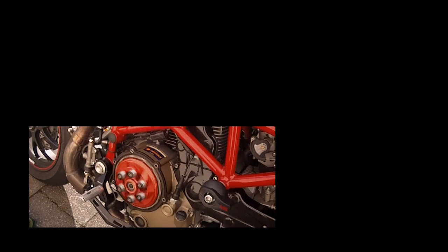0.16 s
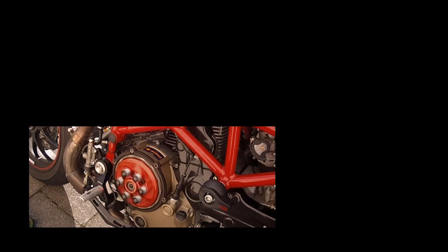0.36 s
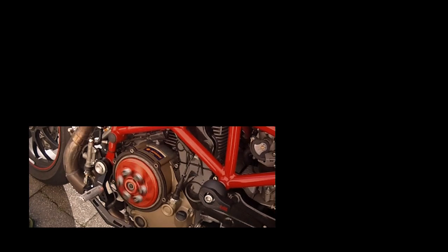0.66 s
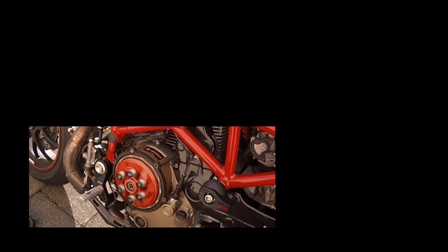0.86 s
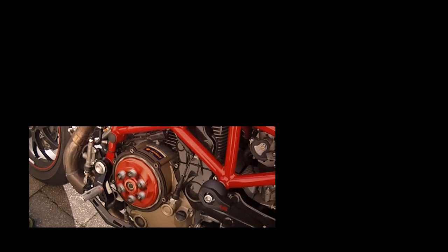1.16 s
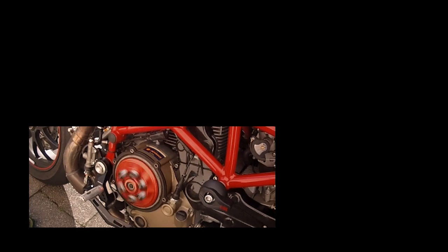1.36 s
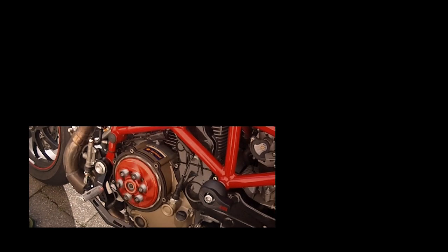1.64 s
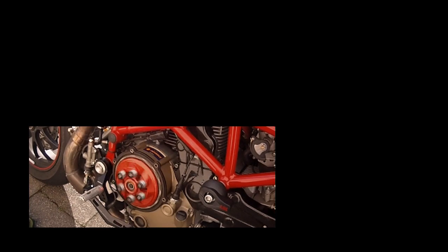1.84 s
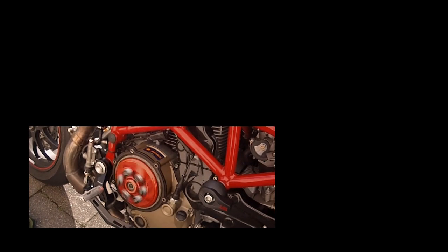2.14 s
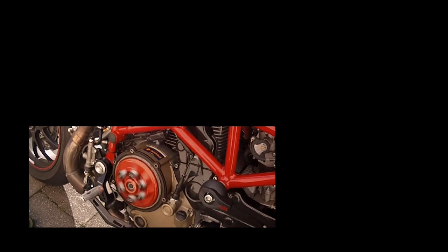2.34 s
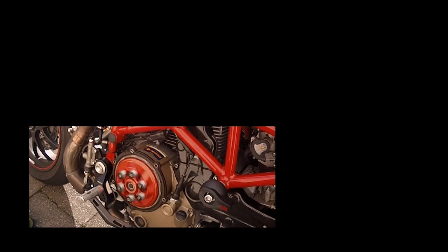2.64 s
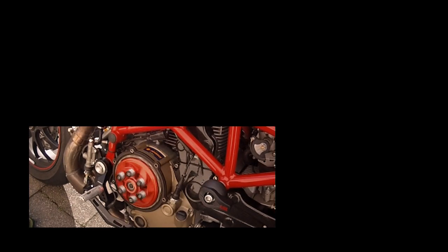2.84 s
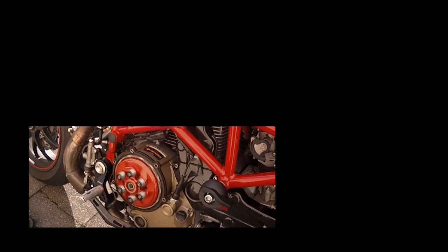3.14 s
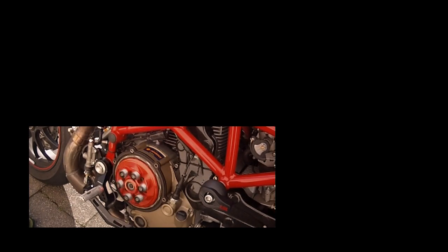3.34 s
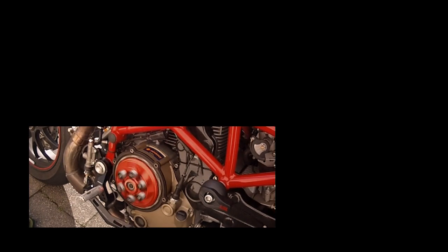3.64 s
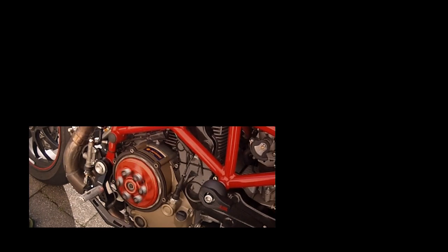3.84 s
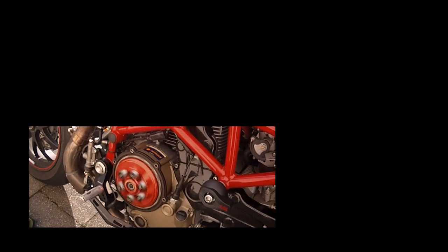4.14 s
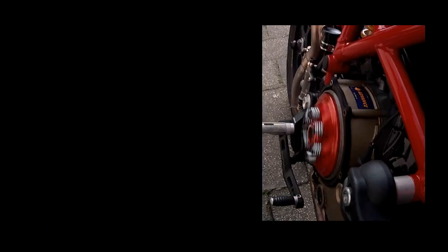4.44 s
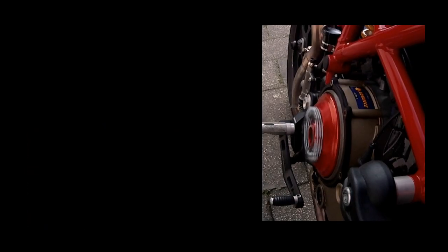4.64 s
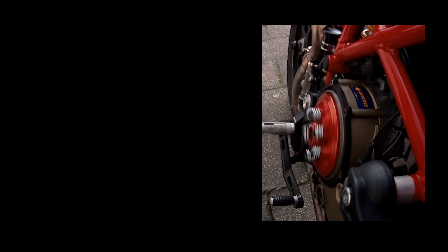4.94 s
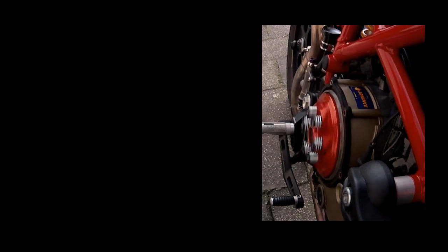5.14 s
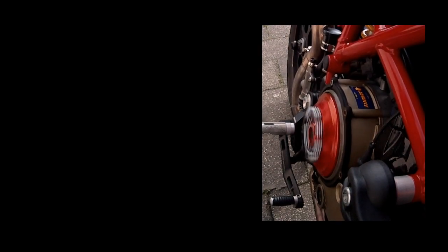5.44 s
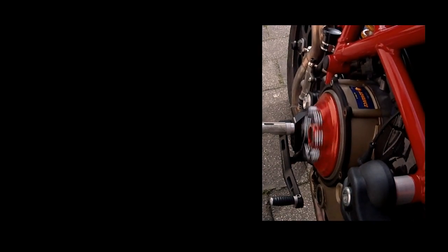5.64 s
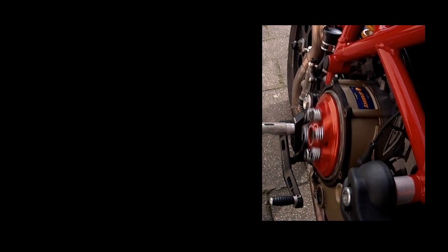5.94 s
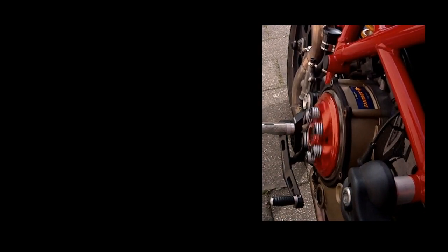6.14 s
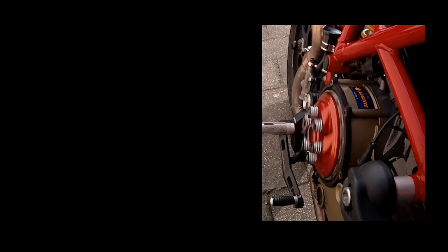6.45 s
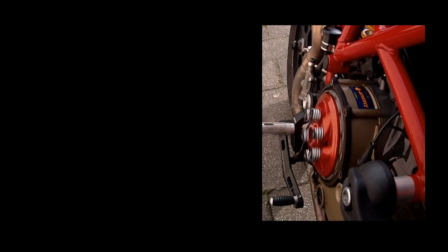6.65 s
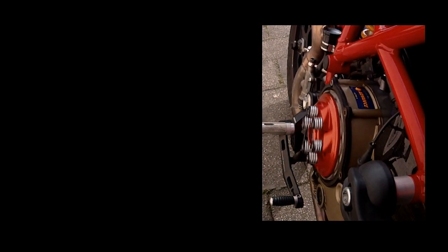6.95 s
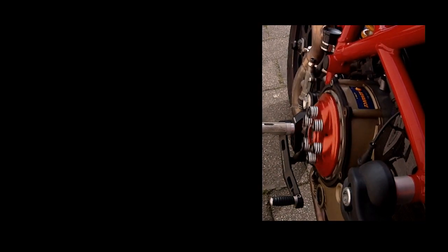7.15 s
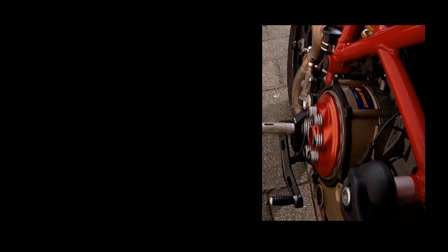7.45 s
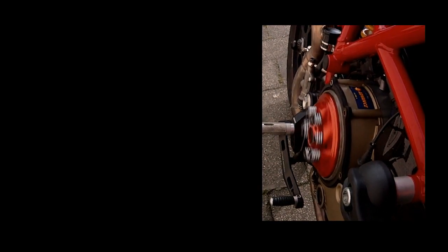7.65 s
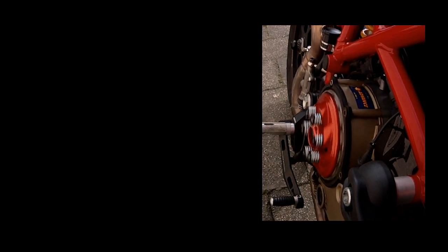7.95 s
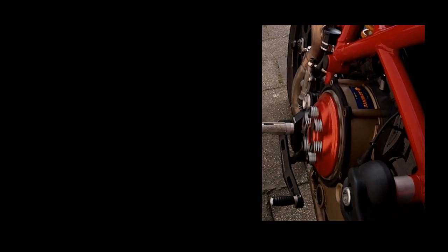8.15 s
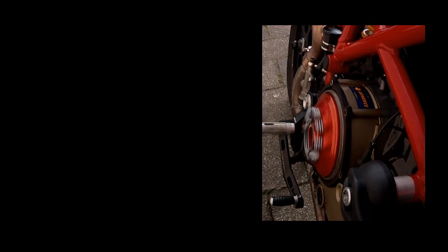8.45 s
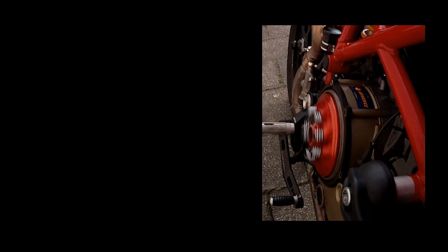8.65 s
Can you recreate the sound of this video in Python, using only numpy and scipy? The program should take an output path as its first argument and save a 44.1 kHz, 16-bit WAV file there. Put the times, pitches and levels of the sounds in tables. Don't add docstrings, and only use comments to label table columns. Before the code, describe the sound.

A lumpy motorcycle idle with bright metal plate rattle, heard close and dry beside the engine. The rider blips the throttle repeatedly; each burst brings a throaty roar and hard clacking, then falls to slow, separate thuds and loose slams. Midway the listening point cuts to the clutch, where the clatter is louder, with knocking from the crankcase. After a stretch of steady idle come two last blips, the final one strongest.

```python
import sys
import numpy as np
from scipy import signal
from scipy.io import wavfile
from scipy.ndimage import uniform_filter1d

SR = 44100
rng = np.random.default_rng(int(sys.argv[2]) if len(sys.argv) > 2 else 0)


def digitize_waveform(pressure):
    field = np.atleast_2d(pressure).T
    bounded = np.clip(field, -1, 1)
    quanta = np.round(bounded * 32767).astype(np.int16)
    wavfile.write(sys.argv[1], SR, quanta)


def attenuation_scalar(level_db):
    decades = np.asarray(level_db, float) / 20
    return 10 ** decades


N = 387638
T = np.arange(N) / SR
CHANGE_S = 4.445
IDLE = 11.7
SECOND_CYLINDER = .375


def revs():
    # opens_s, top_s, top_speed_hz (engine cycles per s)
    blips = [
        (.47, .72, 23.5),
        (1.15, 1.46, 32.),
        (1.93, 2.38, 35.),
        (3.5, 3.71, 24.5),
        (3.88, 4.13, 31.),
        (4.43, 4.72, 39.),
        (5.25, 5.56, 35.),
        (7.42, 7.63, 32.),
        (8.14, 8.45, 56.5),
    ]
    sagged, first, recover_s = 8.5, 4.4, .3
    coast = 67.
    halfway = .42
    inertia_s = 0.06
    speed = np.interp(T, [0, recover_s], [first, IDLE])
    for opens, top_s, top in blips:
        now = np.interp(opens, T, speed)
        slow_s = top_s + (top - sagged) / coast
        times = [opens, (opens + top_s) / 2, top_s, slow_s, slow_s + recover_s]
        speeds = [now, now + halfway * (top - now), top, sagged, IDLE]
        speed = np.where(T < opens, speed, np.interp(T, times, speeds))
    return uniform_filter1d(speed, int(inertia_s * SR), mode="nearest")


def crank(speed):
    beats = [.365, .512, .63, .677, .718, .801, .844, 1.061, 1.293, 1.378, 1.48, 1.549, 1.637, 2.196, 2.368,
             2.467, 2.599, 2.757, 3.005, 3.164, 3.588, 3.684, 3.783, 3.966, 4.054, 4.198, 4.28, 4.389,
             4.556, 4.738, 4.796, 4.862, 4.989, 5.41, 5.574, 5.636, 5.711, 5.803, 5.863, 7.542, 7.649,
             7.718, 7.801, 7.908, 8.243, 8.314, 8.362, 8.506, 8.593, 8.688, 8.749, 8.783]
    start_cycle = .864
    cycles = start_cycle + np.cumsum(speed) / SR
    at = np.add(beats, .003)
    there = np.interp(at, T, cycles)
    whole = np.round(there[0]) + np.cumsum(np.round(np.diff(there, prepend=there[0])))
    return cycles + np.interp(T, at, whole - there)


def loudness(speed, beside_db, near_db, speed_db, throttle_db, fade_s):
    # starts_s, widest_s, shuts_s, effort (0-1.5)
    grip = [
        (0.456, 0.734, 0.51, 0.68),
        (1.19, 1.383, 1.316, 0.99),
        (1.958, 2.338, 2.25, 1),
        (3.503, 3.63, 3.3, 0.48),
        (3.906, 4.068, 3.99, 1),
        (4.387, 4.598, 4.63, 1.18),
        (5.243, 5.45, 5.49, 0.98),
        (7.39, 7.55, 7.56, 0.77),
        (8.153, 8.305, 8.5, 0.98),
    ]
    swell = 1.28
    knee = 12.5
    throttle = 0
    for starts, widest, shuts, effort in grip:
        opening = np.interp(T, [starts, widest, shuts, shuts + fade_s], [0, 1, 1, 0])
        throttle = throttle + effort * opening ** swell
    place_db = np.where(T < CHANGE_S, beside_db, near_db)
    return place_db + speed_db * np.tanh((speed - IDLE) / knee) + throttle_db * throttle


def firings(cycles):
    thuds = np.zeros(N)
    for offset, db in ((.06, -9), (SECOND_CYLINDER + .04, -6), (.51, -8), (2 * SECOND_CYLINDER, -12)):
        at = np.flatnonzero(np.diff(np.floor(cycles - offset))) - 5
        chance = rng.standard_normal((400, 2))[:len(at)]
        at = at + (8 * chance[:, 0]).astype(int)
        thuds[np.clip(at, 0, N - 1)] += attenuation_scalar(db + 1.6 * chance[:, 1])
    return levelled(thuds, span=0.6)


def roar(speed):
    gaining = uniform_filter1d(np.gradient(speed) * SR, SR // 20)
    return .1 + .22 / (1 + np.exp(-gaining / 25 - .3)) + .6 * np.exp(-speed / 10)


def exhaust(cycles, thuds, share, speed):
    first = np.exp(-(cycles % 1) / 0.19)
    second = .5 * np.exp(-((cycles - SECOND_CYLINDER) % 1) / 0.036)
    gate = 0.49 + first + second
    soft = signal.lfilter(*signal.butter(2, 800, fs=SR), thuds)
    drive = (1 - share) * soft + 3.1 * share * evened(gate * rng.standard_normal(N))
    heard = yard(through_pipe(drive), -13, .06)
    level_db = loudness(speed, beside_db=-66.5, near_db=-65.5, speed_db=19.5, throttle_db=2, fade_s=2)
    return attenuation_scalar(level_db) * levelled(heard, span=0.98)


def through_pipe(drive):
    # pitch_hz, level_db (per Hz)
    pipe = [
        [(100, -22), (170, -3), (252, 1), (388, -3), (570, -4.5), (748, -14.5), (1010, -16), (1600, -10),
         (2080, -51), (3520, -120)],
        [(100, -32), (170, -10.5), (227, -10), (290, 4.5), (344, 4), (482, -2.5), (770, -7.5), (1040, -9.5),
         (1600, -9.5), (2080, -37), (3520, -120)],
    ]
    # pitch_hz, width_hz, level_db (above the colour)
    pipe_rings = [
        [(201, 45, 2), (276, 79, 2.5), (321, 33, 2), (436, 46, -3)],
        [(311, 37, 2.5), (346, 22, -0.5), (410, 45, 2), (455, 57, -2.5)],
    ]
    return placed(drive, pipe, pipe_rings)


def pops(cycles, speed):
    # delay_s, share (of the direct pop)
    pop_echoes = [
        [(.002, -.35), (.0038, .3), (.0095, .3), (.0165, .3)],
        [(.0043, -.4), (.0062, .45), (.009, .15), (.016, .25)],
    ]
    half_width_s, lag_s, lead_s = .0005, .001, .003
    level_db = loudness(speed, beside_db=-40.5, near_db=-44.5, speed_db=10.5, throttle_db=0, fade_s=0.2)
    train = np.zeros(N)
    for offset, db, spread_db in ((0, 0, 1.5), (SECOND_CYLINDER, -7, 3)):
        at = np.flatnonzero(np.diff(np.floor(cycles - offset)))
        train[at] = attenuation_scalar(level_db[at] + db + spread_db * rng.standard_normal(400)[:len(at)])
    t = np.arange(1200) / SR - lead_s
    heard = []
    for echoes in pop_echoes:
        shape = np.exp(-((t - lag_s) / half_width_s) ** 2) * 0
        for delay, share in [(0.00063, 0.91)] + echoes:
            v = (t - lag_s - delay) / half_width_s
            shape += share * (np.exp(-v ** 2) - .3 * np.exp(-(.3 * v) ** 2))
        heard.append(signal.oaconvolve(train, shape)[round(lead_s * SR):][:N])
    return np.where(T < CHANGE_S, *heard)


def catches():
    # time_s, peak_db
    heavy = [(0.025, -39), (0.172, -40), (0.845, -41), (1.064, -39.5), (2.759, -45), (2.894, -42),
             (3.002, -54), (5.135, -45), (5.937, -48), (6.109, -46), (8.015, -40)]
    s, peak_db = np.transpose(heavy)
    bark = np.zeros(N)
    for at, db in zip((s * SR).astype(int), peak_db):
        bark[at:at + 900] += attenuation_scalar(db - 1) * np.exp(-np.arange(900) / 300) * rng.standard_normal(900)
    bark = signal.lfilter(*signal.butter(2, 600, fs=SR), bark)
    return through_pipe(bark)


def tones(cycles, speed):
    # order (multiple of the cycle rate), level_db
    orders = [(3, 0), (4, 0), (6, 0), (7, 0), (8, -8), (10, 4)]
    # pitch_hz, width_hz, level_db
    tone_bands = [(150, 80, 0), (370, 200, 0)]
    full_speed = 44.9
    swells = uniform_filter1d(rng.standard_normal((len(orders), N // 512 + 2)), size=9, axis=1)
    level_db = -52 + .5 * np.minimum(speed - full_speed, 0)
    smooth = uniform_filter1d(cycles, size=1600, mode="nearest")
    turning = np.gradient(smooth) * SR
    total = np.zeros(N)
    for (k, db), s in zip(orders, swells):
        swell_db = 5.6 * np.interp(T, np.arange(len(s)) * 512 / SR, s)
        tone = attenuation_scalar(level_db + db + swell_db) * np.sqrt(2) * np.cos(2 * np.pi * k * smooth)
        total += tone * sum(attenuation_scalar(band_db) / (1 + (2 * (k * turning - hz) / width) ** 2)
                            for hz, width, band_db in tone_bands)
    return total


def rumble(cycles, thuds, share, speed):
    # pitch_hz, level_db (per Hz)
    boom_colour = [
        [(18, -29), (30, -7), (54, -0.5), (81, 0), (113, 2), (157, 5), (185, -6), (270, -32), (460, -120)],
        [(18, -72), (43, -25), (75, -26), (95, -7.5), (134, 2), (165, 2.5), (210, -11), (270, -27), (460, -120)],
    ]
    lag_s = 0.04
    throb = 1 + 0.03 * np.cos(4 * np.pi * cycles)
    drive = (1 - share) * thuds + 9.1 * share * throb * rng.standard_normal(N)
    drive += 0.13 * (1 - share) * np.cos(8 * np.pi * cycles)
    late_speed = np.interp(T - lag_s, T, speed)
    level_db = loudness(late_speed, beside_db=-61.5, near_db=-56, speed_db=7.5, throttle_db=-0.5, fade_s=28)
    boom = attenuation_scalar(level_db) * levelled(yard(placed(drive, boom_colour), -50.0, 0.75), span=0.27)
    low_band = signal.butter(3, (40, 85), "band", fs=SR, output="sos")
    shudder = signal.sosfilt(low_band, rng.standard_normal(N))
    return boom + attenuation_scalar(-65.0) * evened(shudder)


def slams():
    # time_s, peak_db
    stumbles = [(0.152, -29.5), (0.2, -28), (0.298, -29.5), (0.37, -30), (0.452, -32.5), (1.004, -31),
                (1.033, -27.5), (1.081, -36), (0.964, -45), (1.108, -46), (1.702, -49), (1.761, -38),
                (1.804, -29.5), (1.9, -28.5), (2.704, -30.5), (2.731, -27.5), (2.839, -30.5), (2.869, -35),
                (2.671, -35), (4.386, -38), (4.436, -33),
                (4.454, -24.5), (4.524, -33), (4.586, -38), (4.661, -24), (4.705, -33), (4.737, -41),
               (4.86, -38), (4.895, -33), (5.058, -36), (5.116, -28), (5.162, -26), (5.252, -27.5),
               (5.63, -37), (5.694, -38), (7.8655, -49), (7.752, -38), (7.957, -24.5), (7.986, -28.5),
               (8.097, -26), (8.17, -28), (8.193, -32), (8.75, -30.5)]
    # time_s, peak_db
    idle_clacks = [(2.941, -36.5), (2.9917, -33), (3.0132, -43), (3.065, -34.5), (3.099, -35), (3.162, -31),
                   (3.2475, -31.5), (3.327, -34), (3.3594, -39), (3.4112, -40), (3.4382, -31.5),
                   (5.8758, -37), (5.9136, -31), (5.939, -29), (5.9731, -37), (5.998, -33), (6.073, -28),
                 (6.1196, -37), (6.152, -28.5), (6.2035, -29.5), (6.2327, -31), (6.275, -36.5),
                 (6.315, -33.5), (6.362, -33), (6.4036, -33), (6.447, -34), (6.487, -29), (6.5394, -29.5),
                 (6.565, -27.5), (6.6123, -32.5), (6.645, -30.5), (6.705, -30), (6.731, -31), (6.792, -33),
                 (6.8795, -28.5), (6.907, -29.5), (6.959, -37), (6.992, -30), (7.048, -42), (7.058, -37),
                 (7.089, -33), (7.141, -34), (7.174, -32), (7.232, -37), (7.2637, -29), (7.311, -31),
                 (7.396, -30), (7.4334, -30)]
    # time_s, peak_db
    runs = [
        [(0.4998, -32.5), (0.5277, -30.5), (0.5656, -26.5), (0.5886, -32), (0.6215, -32), (0.6395, -29),
         (0.6689, -31), (0.6854, -24.5), (0.7108, -28), (0.7612, -38)],
        [(1.1528, -28.5), (1.1832, -32), (1.2266, -25), (1.2501, -32), (1.2835, -29), (1.3034, -30),
         (1.3304, -31.5), (1.3473, -28), (1.3708, -30), (1.4042, -27)],
        [(1.9588, -32.5), (1.9857, -30), (2.0271, -27.5), (2.0501, -36), (2.0875, -30), (2.1089, -32),
         (2.1419, -27), (2.1633, -30), (2.1893, -34), (2.2047, -32), (2.2292, -34), (2.2651, -28), (2.299, -31),
         (2.3115, -25)],
        [(3.4893, -36), (3.5008, -31), (3.5327, -29), (3.5771, -28), (3.6001, -31), (3.6315, -27.5),
         (3.6494, -26), (3.6769, -30), (3.6938, -32)],
        [(3.8903, -44), (3.8903, -36), (3.9153, -25.5), (3.9562, -26.5), (3.9761, -26), (4.0066, -29),
         (4.0475, -34), (4.0834, -30), (4.0959, -28), (4.1602, -35)],
    ]
    # time_s, peak_db
    runs_near = [
        [(4.5073, -20.5), (4.5482, -26), (4.6151, -36), (4.7887, -47)],
        [(5.3008, -22.5), (5.3232, -28), (5.3567, -26), (5.4021, -20.5), (5.44, -28), (5.4859, -25),
         (5.5148, -22), (5.5916, -49), (5.6021, -48)],
        [(7.4803, -27), (7.5022, -36), (7.5317, -26), (7.5726, -21), (7.605, -25)],
        [(8.2338, -20), (8.2523, -29), (8.2762, -23), (8.3076, -20.5), (8.4209, -28), (8.4373, -27),
         (8.581, -44), (8.6224, -31)],
    ]
    early_s = -.002
    idle = np.transpose(idle_clacks) + [[early_s], [3.5]]
    hard = np.transpose(sum(runs + runs_near, [])) + [[early_s], [1.5]]
    return np.hstack([bounced(np.transpose(stumbles)), idle, hard])


def bounced(blows):
    chance = rng.standard_normal((blows.shape[1], 2)).T
    delay_s = .011 + .002 * chance[0]
    change_db = np.where(blows[0] < CHANGE_S, -5., -1.5) + 0.59 * chance[1]
    return np.hstack([blows, blows + [delay_s, change_db]])


def slam_envelope(blows, spread_db, rise, fall, quick_part):
    s, peak_db = blows
    chance = rng.standard_normal((len(s), 2))
    at = ((s + .0008 * chance[:, 0]) * SR).astype(int)
    hits = np.zeros(N)
    hits[np.clip(at, 0, N - 1)] = attenuation_scalar(peak_db + spread_db * chance[:, 1])
    t = np.arange(4000) / SR
    shape = (1 - np.exp(-(t / rise) ** 2)) * (np.exp(-t / fall) + quick_part * np.exp(-t / 0.0018))
    return abs(signal.oaconvolve(hits, shape)[:N])


def ticks(per_s, spread_db):
    size = attenuation_scalar(spread_db * np.minimum(rng.exponential(1, N), 4)) * rng.choice([-1., 1.], N)
    return evened(size * (rng.random(N) < per_s / SR))


def cracks(blows):
    tick = np.zeros(N)
    chance = rng.standard_normal((blows.shape[1], 2)).T
    at = ((blows[0] + .0028) * SR).astype(int)
    tick[np.clip(at, 0, N - 1)] = np.sign(chance[0]) * attenuation_scalar(blows[1] - 17 + 0.33 * chance[1])
    return tick


def plate_by_plate(x, spread_db):
    z = signal.stft(x, SR, nperseg=512, noverlap=384)[2]
    patches = rng.standard_normal(z.shape)
    patches = evened(uniform_filter1d(uniform_filter1d(patches, size=2, axis=0), size=9, axis=1))
    rung = signal.istft(z * attenuation_scalar(spread_db * patches), SR, nperseg=512, noverlap=384)[1][:N]
    return evened(rung) * np.std(x)


def clutch(speed, blows):
    # low_hz, high_hz
    plate_bands = [(500, 1800), (1800, 3400), (3400, 5200), (5200, 7200), (7200, 9800), (9800, 17000)]
    # pitch_hz, level_db (per Hz)
    plates = [
        [(530, -48), (900, -36), (1000, -15.5), (1330, -8), (2370, 0), (3120, -1), (4090, 0.5), (5060, -5),
         (5830, -1.5), (7050, -11.5), (8620, -6.5), (10900, -10.5), (13000, -17), (16000, -22)],
        [(530, -22), (1030, -17), (1610, -2), (1800, -7), (2100, -2), (2870, -0.5), (3420, -11.5), (3900, -5.5),
         (4880, -13.5), (5500, -11.5), (7050, -18.5), (8150, -14.5), (10000, -19), (16000, -25)],
    ]
    # pitch_hz, width_hz, level_db (above the colour)
    plate_rings = [
        [(1330, 50, 5), (1890, 50, 6), (2110, 40, 4), (2560, 40, 8), (2970, 60, 3), (3850, 90, 4),
         (4350, 80, 4), (5650, 40, 6), (8280, 60, 4)],
        [(1325, 50, 5), (2130, 60, 3), (2570, 40, 6), (2845, 70, 4), (2945, 60, 4), (3800, 50, 3),
         (4150, 50, 6), (5665, 60, 10), (5850, 160, 10), (6050, 160, 9), (7540, 60, 4), (8285, 70, 8),
         (8450, 150, 4), (8700, 250, 9), (8980, 300, 8), (11280, 70, 4)],
    ]
    jingle_db = loudness(speed, beside_db=-50, near_db=-46.5, speed_db=0.5, throttle_db=9.5, fade_s=0.3466)
    drive = np.zeros(N)
    clumps = evened(uniform_filter1d(uniform_filter1d(rng.standard_normal(N), 250), 250))
    for edges in plate_bands:
        flicker = evened(uniform_filter1d(uniform_filter1d(rng.standard_normal(N), 300), 300))
        struck = attenuation_scalar(jingle_db - 2.0 + 0.25 * flicker + 1.45 * clumps)
        struck += attenuation_scalar(-9.5) * slam_envelope(blows, spread_db=1.3, rise=0.0029, fall=0.0058, quick_part=0.031)
        band = signal.butter(3, edges, "band", fs=SR, output="sos")
        drive += signal.sosfilt(band, struck * ticks(3500, 2.2))
    return placed(plate_by_plate(drive, spread_db=3.2) + cracks(blows), plates, plate_rings)


def knock(speed, blows):
    # pitch_hz, width_hz, level_db
    case = [(529, 26, 0), (613, 41, 10), (663, 53, 11.5), (774, 32, 3)]
    slam = slam_envelope(blows, spread_db=1.0, rise=0.0041, fall=0.0072, quick_part=0.048)
    slam = attenuation_scalar(np.where(T < CHANGE_S, -28, -19.5)) * slam
    rattle = attenuation_scalar(loudness(speed, beside_db=-64, near_db=-60.5, speed_db=2, throttle_db=10, fade_s=0.1))
    drive = (slam + rattle) * ticks(900, 2.15)
    t = np.arange(3000) / SR
    modes = sum(attenuation_scalar(db) * np.exp(-np.pi * width * t) * np.sin(2 * np.pi * hz * t) for hz, width, db in case)
    return signal.oaconvolve(drive, modes / np.linalg.norm(modes))[:N]


def yard(x, wet_db, t60):
    at = np.arange(60, SR // 3, 20)
    taps = np.zeros(SR // 3 + 20)
    taps[at + rng.integers(0, 20, len(at))] = rng.choice([-1., 1.], len(at)) * attenuation_scalar(-60 * at / SR / t60)
    return x + attenuation_scalar(wet_db) * signal.oaconvolve(x, taps / np.linalg.norm(taps))[:N]


def placed(x, spectra, rings=((), ())):
    near = np.clip((T - CHANGE_S) / 0.013, 0, 1)
    return (1 - near) * colour(x, spectra[0], rings[0]) + near * colour(x, spectra[1], rings[1])


def colour(x, spectrum, rings=(), size=8192):
    hz = abs(np.fft.fftfreq(size, 1 / SR)) + 1
    f, level_db = np.transpose(spectrum)
    gain = attenuation_scalar(np.maximum(np.interp(np.log(hz), np.log(f), level_db), -100))
    for ring_hz, width, db in rings:
        gain = gain * (1 + (attenuation_scalar(db) - 1) / (1 + (2 * (hz - ring_hz) / width) ** 2))
    taps = np.fft.ifft(np.exp(np.conj(signal.hilbert(np.log(gain))))).real[:size // 2]
    return signal.oaconvolve(x, taps / np.linalg.norm(taps))[:N]


def evened(x):
    return x / np.sqrt(np.mean(x ** 2) + 1e-20)


def levelled(x, span=.2):
    width = int(span * SR)
    power = uniform_filter1d(uniform_filter1d(x ** 2, width), width)
    return x / np.sqrt(abs(power) + 1e-12)


def scene():
    speed = revs()
    blows = slams()
    cycles = crank(speed)
    thuds, share = firings(cycles), roar(speed)
    engine = exhaust(cycles, thuds, share, speed) + pops(cycles, speed) + catches() + tones(cycles, speed)
    engine += rumble(cycles, thuds, share, speed)
    return (engine + clutch(speed, blows) + knock(speed, blows))[None]


def roll_off(x):
    return signal.sosfilt(signal.butter(12, 15630, fs=SR, output="sos"), x)


def record(dry):
    # pitch_hz, level_db (per bin)
    weakest = [(8800, -110), (9600, -92), (11500, -90.5), (12500, -88.5), (13000, -85), (15280, -85.5),
               (15380, -40)]
    lead = 559
    hz, _, z = signal.stft(np.pad(dry[0], (lead, 0)), SR, "cosine", nperseg=2048)
    bands = (abs(z[:-1]) ** 2).reshape(64, 16, -1).mean(axis=1)
    band_db = 10 * np.log10(np.repeat(bands, 16, axis=0) + 1e-20)
    z[:-1] *= band_db > np.interp(hz[:-1], *np.transpose(weakest), left=-200)[:, None]
    kept = signal.istft(z, SR, "cosine", nperseg=2048)[1][lead:lead + N]
    return roll_off(kept[None])


dry = scene()
out = record(dry)
digitize_waveform(out)
```